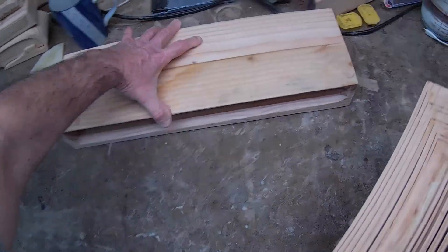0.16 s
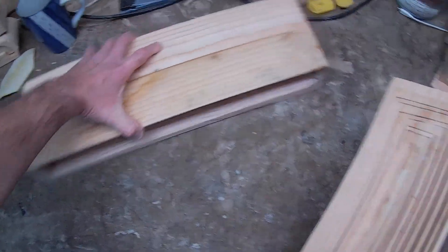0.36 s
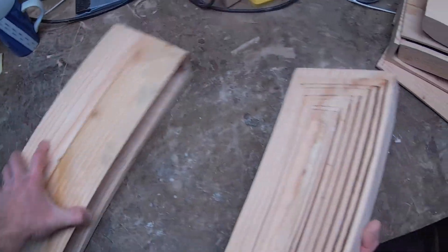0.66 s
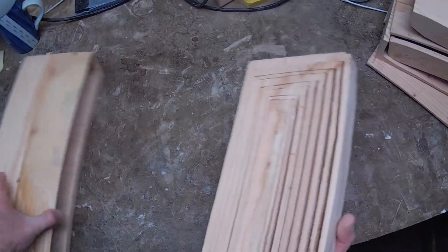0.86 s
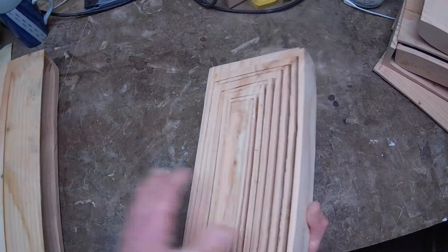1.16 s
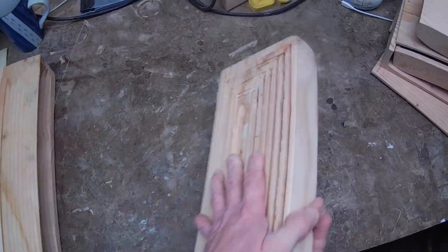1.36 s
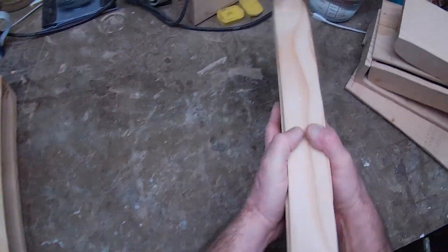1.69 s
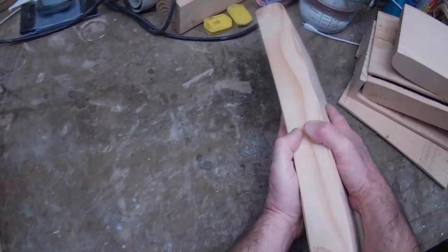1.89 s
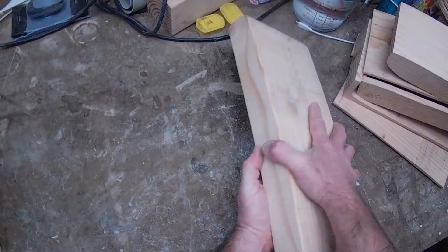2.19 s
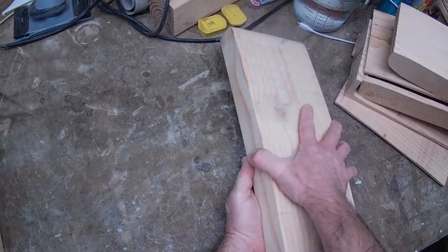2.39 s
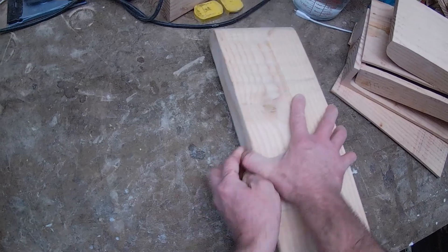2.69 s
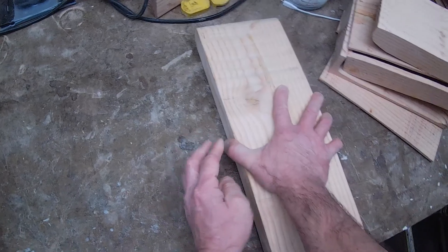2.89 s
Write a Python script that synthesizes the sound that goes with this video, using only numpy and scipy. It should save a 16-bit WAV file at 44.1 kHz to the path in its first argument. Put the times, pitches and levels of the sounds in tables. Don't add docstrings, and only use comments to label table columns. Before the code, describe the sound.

Wooden pieces handled on a workbench: a hollow tray drags with rattling bumps, cracks and drops, palms rub a board, sharp edge knocks follow, then a loud flat slap; close mono microphone, small room, faint hiss.

```python
import sys
import numpy as np
from scipy import signal
from scipy.fft import rfft, irfft
from scipy.io import wavfile
from scipy.ndimage import uniform_filter1d

SR = 44100
rng = np.random.default_rng(int(sys.argv[2]) if len(sys.argv) > 2 else 0)


def master(y):
    cut = np.clip(np.atleast_2d(y).T, -1, 1)
    pcm = np.round(cut * 32767)
    wavfile.write(sys.argv[1], SR, pcm.astype(np.int16))


def gain_from_decibels(decibels):
    exponent = np.asarray(decibels, float) / 20
    return 10 ** exponent


N = 134505

# [t/s, peak level/dB, bass tilt/dB per octave, treble tilt/dB per octave]
TRAY_BUMPS = [(0.278, -43.5, -45, -17), (0.297, -46.5, -28, -5), (0.322, -36, -40, -2),
              (0.354, -28, -12, 1.5), (0.378, -40.5, 7, 8.5), (0.411, -31, -17, -4), (0.432, -33, -25, -17),
              (0.445, -24, -3.5, -3), (0.484, -25.5, -8, -0.5), (0.52, -41, 6, -8), (0.533, -25, -2, -7),
              (0.551, -24.5, -19, -29), (0.571, -27, -7, -15), (0.61, -27, 2, 0.5), (0.633, -28.5, -7, -10),
              (0.654, -24, -3.5, 2), (0.68, -27.5, 3, -2), (0.707, -27, -27, -3), (0.721, -21.5, -1, 0),
              (0.816, -35.5, -20, 1), (0.854, -31.5, 8, 2), (0.875, -38, 10, -1)]
TRAY_KNOCKS = [
    (.106, -41.5, -8, -5),
    (.145, -45.5, -15, -8),
    (.19, -49.5, -8, -14),
    (.738, -17, 2, -3),
    (1.104, -46.5, 13, 7),
]
TRAY_CRACK = [
    (.902, -22.5, 0, -1.1),
    (.906, -31, 0, 0.42),
]
TRAY_DROP = [
    (1.011, -28, 0, 0),
]
EDGE_BLOWS = [
    (1.876, -18.5, 3.5, -4),
    (1.881, -17, -2, 1),
    (1.958, -33.5, -28, -40),
    (2.003, -36.5, -25, -43),
    (2.143, -44, -27, -34),
    (2.153, -52, -25, -36),
    (2.465, -43.5, -5, -4),
]
CORNER_TAPS = [
    (1.277, -44.5, -10, -4.5),
    (2.028, -25, 5.5, 2.5),
    (2.036, -19.5, 0, -1),
    (2.065, -32, 4, -3),
    (2.336, -39, -30, -2),
    (2.42, -28, -18.5, 0.5),
    (2.537, -50, -15, -27),
    (2.575, -31.5, -16, -3.5),
    (2.622, -35, -5.5, 6),
]
FLAT_BLOWS = [
    (2.666, -32.5, 18.5, 14.5),
    (2.709, -29.5, -10, -7),
    (2.719, -26, -1, 9.5),
    (2.731, -20, -10, 7),
    (2.742, -40, -9, 15),
    (2.767, -7.5, 1.5, -1.5),
    (2.771, -12.5, 3, 2.5),
    (2.885, -35.5, 0, -13),
]

# [f/Hz, level/dB, t60/s]
TRAY_MODES = [(120, -12, .2), (185, -10, .12), (236, -7, .12), (281, -8, .1), (366, -3, .15),
              (400, -4, .09), (442, 0, .09), (500, -6, .06), (575, -6, .07), (1165, -14, .07),
              (1425, -15, .07), (1720, -17, .06), (1940, -23, .05), (3150, -22, .025)]
FREE_TRAY_MODES = [(248, -10, .05), (371, -6, .42), (480, -2, .04), (560, -6, .04), (732, -7, .1),
                   (1631, -18, .03), (2600, -13, .015), (3000, -9, .014), (3400, -6, .016),
                   (3900, -9, .013), (4600, -13, .012)]
SEATED_TRAY_MODES = [(110, -9, 0.24), (163, -16, .2), (220.7, -3, .24), (267, 2.5, 0.22), (360, -5, 0.42),
                     (477, -9.5, 0.105), (740, -5.5, 0.037), (1050, -11, 0.048)]
EDGE_MODES = [(62, -22, .2), (130, -22, .18), (267, 4, .095), (320, -16, .08), (480, -8, .12),
              (555, -9, .09), (645, -12, .06), (1110, -3, .035), (1400, -6, .04)]
CORNER_MODES = [(140, 11.5, 0.027), (471.5, 0.5, 0.095), (678.6, 8, 0.072), (818, 15, 0.03),
                (1067, 1.5, 0.016), (1293, -7.5, 0.16), (1453, 3, 0.067), (1802, 11, 0.027),
                (1967, 4, 0.022)]
FLAT_MODES = [(62, -29, .22), (126, -13, .16), (168, -12, .14), (205, -10, .1), (264, -2, .11),
              (318, -7, .1), (380, -6, .1), (432, -3, .09), (478, 3, .085), (545, 3, .065), (651, -2, .07),
              (867, -12, .08), (1179, -14, .07), (1529, -13, .07)]
# [f/Hz, level/dB]
GRAIN_LEVEL = [(60, -24), (220, -7.5), (600, 0), (1000, -0.5), (1800, -5.5), (2350, -21), (3200, -16.5),
               (4800, -36.5), (12000, -52)]
# [f/Hz, t60/s]
GRAIN_DECAY = [(100, .12), (600, .065), (2000, .05), (5000, .024)]
SPOT_DB, DETUNE, MIDDLE_HZ = 2.5, .012, 450

# [t/s, pressure level/dB, fine hiss level/dB]
DRAG_STROKE = [
    (.26, -70, -12),
    (.29, -53, -29),
    (.33, -47, -20.5),
    (.6, -42.5, -20),
    (.75, -49.5, -13.5),
    (.8, -50.5, -9),
    (.93, -50, -7.5),
    (1.09, -59.5, -13.5),
    (1.125, -58, -27),
]
SLIDE_STROKE = [
    (2.53, -80, -29),
    (2.56, -69, -25.5),
    (2.67, -57, -25.5),
    (2.71, -61.5, -22.5),
    (2.722, -48, -29),
    (2.745, -62.5, -21.5),
    (2.765, -54.5, -40.5),
    (2.81, -68, -23.5),
]
PALM_STROKES = [
    [(.09, -71, -12), (.12, -62.5, -12), (.155, -58, -17), (.2, -71, -22)],
    [(1.27, -79, -11), (1.35, -61, -15), (1.45, -71.5, -15), (1.56, -64, -15), (1.64, -71, -20)],
    [(1.89, -61, -25), (1.93, -63, -15), (2.04, -53.5, -24.5), (2.1, -73, -36)],
    [(2.1, -68.5, -21), (2.24, -59, -18), (2.35, -58.5, -21), (2.45, -62.5, -19), (2.51, -76, -25)],
]
# [f/Hz, spectrum level/dB]
DRAG_COLOUR = [(100, -61), (300, -64), (500, -4.5), (1000, -21), (1800, -17.5), (2350, -28), (3300, -19),
               (5000, -35), (7000, -42)]
SLIDE_COLOUR = [(59, -31), (100, 4), (334, -8), (535, 14.5), (828, 8.5), (1720, 5.5), (2280, -7),
                (3720, -5.5), (6500, -26), (8450, -62), (14300, -120)]
PALM_COLOUR = [(100, -18.5), (400, -7), (550, -6.5), (1500, -1.5), (1950, -10), (2350, -14), (3300, -9),
               (4600, -18.5), (6500, -32.5)]
HISS_COLOUR = [(2940, -40.5), (5000, -43.5), (5800, 3.5), (7300, 3.5), (8600, 5.5), (9600, 6), (10700, 5),
               (13000, 1)]
# [t/s, length/s, f/Hz, level/dB]
SKIN_SQUEAKS = [
    (1.66, .21, 1290, -64),
    (2.96, .085, 1590, -70),
]
# [t/s, level/dB]
DRY_TICKS = [
    (.904, -44),
    (.909, -50),
    (.735, -54),
    (.857, -55),
    (2.83, -57),
]

# [f/Hz, t60/s]
ROOM_T60 = [(60, 0.42), (400, 0.29), (3000, 0.23), (10000, 0.19)]
# [f/Hz, level/dB]
WHINE_TONES = [(2290, -99), (4570, -88), (6830, -94), (9170, -97), (11500, -98)]
# [f/Hz, spectrum level/dB]
FLOOR_COLOUR = [(28, 6.5), (60, 0.5), (450, -1.5), (900, -2.5), (1500, 0), (2300, -14), (3300, -13),
                (5000, -19), (12800, -20.5)]
ROOM_DB, FLOOR_DB = -12, -67
# [t/s, f/Hz]
UPPER_LIMIT = [(0, 12500), (.2, 12200), (.4, 11700), (.5, 11250), (.67, 11250), (.8, 12600), (.9, 13100),
               (1.0, 12900), (1.05, 11900), (1.2, 12500), (2.02, 12700), (2.05, 10300), (2.1, 11600),
               (2.22, 12500), (2.75, 12900), (2.785, 9900), (2.83, 11500), (3.05, 12200)]


def knocks(blows, modes, rise_s, held_t60, dense_db):
    out = np.zeros(N + SR)
    t = np.arange(SR // 3) / SR
    contact = (1 - np.exp(-(t / rise_s) ** 2)) * gain_from_decibels(-60 * t / held_t60)
    for s, db, bass_db, treble_db in blows:
        spot = SPOT_DB * rng.standard_normal(len(modes))
        body = ring(modes, spot + tilt(np.transpose(modes)[0], bass_db, treble_db))
        body[:4000] += gain_from_decibels(dense_db) * thud(bass_db, treble_db)
        hit = body * contact
        at = round(s * SR)
        out[at:at + len(hit)] += gain_from_decibels(db) * hit / abs(hit).max()
    return out[:N]


def ring(modes, extra_db):
    hz, db, t60 = np.transpose(modes)[:, :, None]
    t = np.arange(SR // 3) / SR
    shift, lag = rng.standard_normal((2, len(hz), 1))
    decay = gain_from_decibels(db + extra_db[:, None] - 60 * t / np.maximum(t60, .004))
    return (decay * np.sin(2 * np.pi * hz * (1 + DETUNE * shift) * t + lag)).sum(0)


def thud(bass_db, treble_db):
    hz = np.geomspace(80, 12500, num=160) * rng.uniform(1.0, 1.02, size=160)
    t = np.arange(4000) / SR
    level = read(GRAIN_LEVEL, hz) + tilt(hz, bass_db, treble_db)
    level += 10 * np.log10(hz / MIDDLE_HZ) + 2 * rng.standard_normal(len(hz))
    t60 = read(GRAIN_DECAY, np.clip(hz, 110, 4700)) * rng.uniform(.6, 1.2, len(hz))
    polarity = .5 * rng.integers(0, 2, len(hz))
    turns = (hz[:, None] * t + polarity[:, None]).astype(np.float32)
    fall = np.log(gain_from_decibels(level))[:, None] - np.log(1000) * t / t60[:, None]
    return (np.exp(fall.astype(np.float32)) * np.sin(2 * np.pi * turns)).sum(0)


def tilt(hz, bass_db, treble_db):
    octaves = np.log2((hz + 1) / MIDDLE_HZ)
    return bass_db * np.clip(-octaves, 0, 2) + treble_db * np.clip(octaves, 0, 2.5)


def rub(stroke, colour, modes, body_db, grain_db, lumpy_db, level_db):
    s, db, hiss_db = np.transpose(stroke)
    t = np.arange(N) / SR
    lumps = lumpy_db * evened(slow_noise(500))
    push = gain_from_decibels(np.interp(t, s, db, left=-140, right=-140) + level_db)
    slip_size = gain_from_decibels(grain_db * np.minimum(rng.exponential(1, N), 4))
    slips = rng.standard_normal(N) * slip_size * (rng.random(N) < .15)
    scrape = coloured(slips, colour) * gain_from_decibels(lumps)
    fine = coloured(rng.standard_normal(N), HISS_COLOUR) * gain_from_decibels(np.interp(t, s, hiss_db) + 1.2 * lumps)
    tap = ring(modes, tilt(np.transpose(modes)[0], -3.5, 3.6))
    tap *= np.minimum(t[:SR // 3] / 0.0013, 1)
    body = signal.fftconvolve(evened(slips) * push * gain_from_decibels(2 * lumps), tap / np.linalg.norm(tap))[:N]
    return push * (scrape + fine) + gain_from_decibels(body_db) * body


def squeaks():
    out, t = np.zeros(N), np.arange(N) / SR
    for s, length, hz, db in SKIN_SQUEAKS:
        flutter = evened(slow_noise(330))
        swell = np.sin(np.pi * np.clip((t - s) / length, 0, 1)) ** .5
        out += gain_from_decibels(db) * flutter * np.sin(2 * np.pi * hz * t) * swell
    snap = coloured(rng.standard_normal(N), [(2500, 2.9), (4500, 2.7), (12500, 1.1)])
    return out + snap * sum(gain_from_decibels(db) * np.exp(-((t - s) / 0.002) ** 2) for s, db in DRY_TICKS)


def room(x):
    taps = rng.standard_normal(SR // 2) * (np.arange(SR // 2) > 250)
    hz, t, z = signal.stft(taps, SR, nperseg=256)
    decay = gain_from_decibels(-60 * t / read(ROOM_T60, np.clip(hz, 61, 9900))[:, None])
    tail = signal.istft(z * decay, SR, nperseg=256)[1]
    return signal.fftconvolve(x, tail / np.linalg.norm(tail))[:N]


def shop():
    t = np.arange(N) / SR
    wander = 14 * np.cumsum(evened(slow_noise(1500, passes=1))) / SR
    turning = t + wander / 2290
    whine = sum(gain_from_decibels(db) * np.sqrt(2) * np.sin(2 * np.pi * hz * turning) for hz, db in WHINE_TONES)
    return gain_from_decibels(FLOOR_DB) * coloured(rng.standard_normal(N), FLOOR_COLOUR) + whine


def read(points, hz):
    f, value = np.transpose(points)
    return np.interp(np.log(hz + 1), np.log(f + 1), value, left=value[0] - 12, right=value[-1] - 12)


def evened(x):
    return x / np.sqrt(np.mean(x ** 2) + 1e-20)


def slow_noise(samples, passes=2):
    x = rng.standard_normal(N)
    for _ in range(passes):
        x = uniform_filter1d(x, samples)
    return x


def coloured(x, points):
    gain = gain_from_decibels(read(points, np.fft.rfftfreq(N, 1 / SR)))
    return evened(irfft(rfft(x) * gain, N))


def scene():
    wood = knocks(TRAY_BUMPS, TRAY_MODES, rise_s=0.002, held_t60=0.4, dense_db=-24.5)
    wood += knocks(TRAY_KNOCKS, TRAY_MODES, rise_s=0.00053, held_t60=12, dense_db=-26.5)
    wood += knocks(TRAY_CRACK, FREE_TRAY_MODES, rise_s=0.00078, held_t60=2.5, dense_db=-23)
    wood += knocks(TRAY_DROP, SEATED_TRAY_MODES, rise_s=0.00062, held_t60=3.6, dense_db=-30)
    wood += knocks(EDGE_BLOWS, EDGE_MODES, rise_s=0.00057, held_t60=3, dense_db=-19.5)
    wood += knocks(CORNER_TAPS, CORNER_MODES, rise_s=0.0011, held_t60=0.43, dense_db=-4.5)
    wood += knocks(FLAT_BLOWS, FLAT_MODES, rise_s=.0008, held_t60=2.3, dense_db=-14.5)
    wood += rub(DRAG_STROKE, DRAG_COLOUR, TRAY_MODES,
                body_db=1.1, grain_db=1.24, lumpy_db=1.38, level_db=0.42)
    wood += rub(SLIDE_STROKE, SLIDE_COLOUR, FLAT_MODES,
                body_db=-22.0, grain_db=0.83, lumpy_db=0.53, level_db=19.35)
    for stroke in PALM_STROKES:
        wood += rub(stroke, PALM_COLOUR, CORNER_MODES,
                    body_db=-6.0, grain_db=0.33, lumpy_db=1.5, level_db=3.2)
    wood += squeaks()
    wood = signal.sosfilt(signal.butter(3, 55, "high", fs=SR, output="sos"), wood)
    return (wood + gain_from_decibels(ROOM_DB) * room(wood) + shop())[None]


def roll_off(x):
    return signal.sosfilt(signal.butter(12, 13210, fs=SR, output="sos"), x)


def record(dry):
    hz, t, z = signal.stft(dry, SR, nperseg=1024)
    limit = np.interp(t, *np.transpose(UPPER_LIMIT))
    mix = signal.istft(z * (hz[:, None] < limit), SR, nperseg=1024)[1][:, :N]
    return roll_off(mix)


dry = scene()
out = record(dry)
master(out)
```